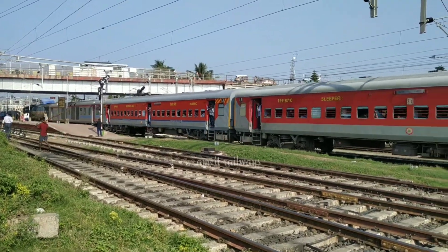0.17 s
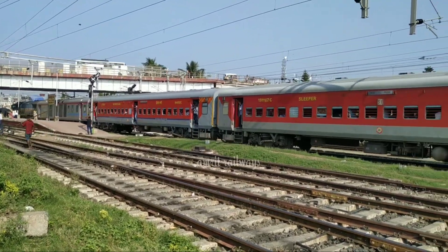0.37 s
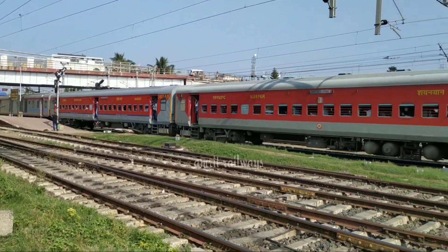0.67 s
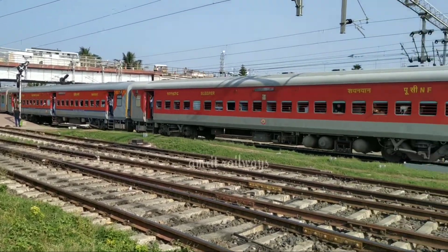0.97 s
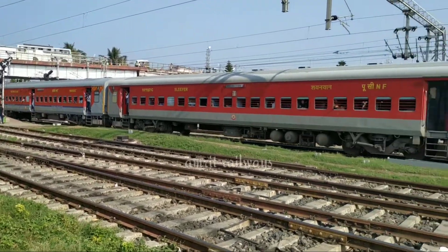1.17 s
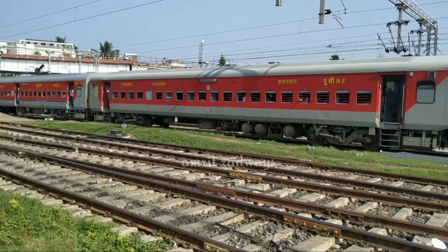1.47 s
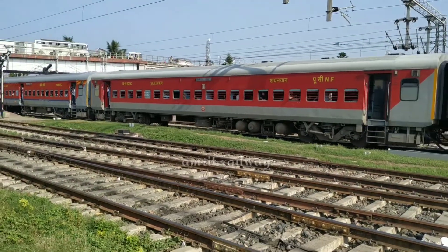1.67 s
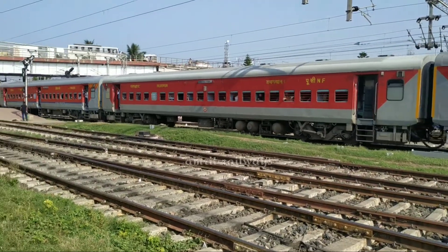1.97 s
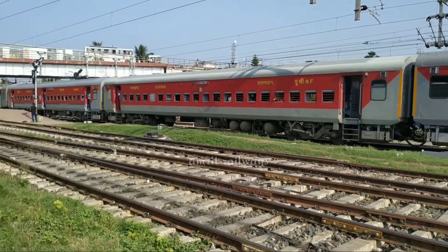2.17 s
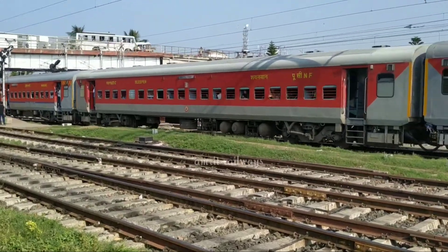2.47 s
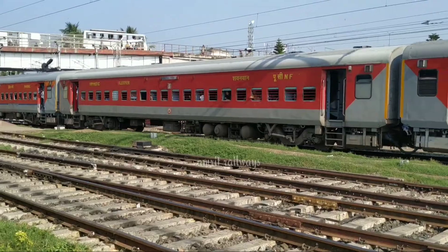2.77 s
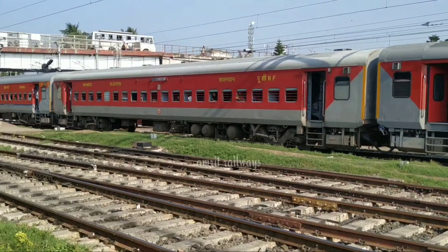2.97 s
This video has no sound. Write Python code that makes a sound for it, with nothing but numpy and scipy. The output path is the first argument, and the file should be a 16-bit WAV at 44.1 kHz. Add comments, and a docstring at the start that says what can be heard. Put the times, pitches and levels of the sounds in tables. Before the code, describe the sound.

Passenger train rolling slowly past with a low rumble and thin wheel squeal

```python
"""Passenger coaches roll slowly over station points, heard from the trackside. From the start two diesels drone
and beat against each other under the rumble, and a wheel squeals thinly. Rail modes ring as wheels pass, wheels
scrape, air hisses in short puffs and swaying bodies boom now and then. From 0.7 s the running gear knocks; near
1.5 s the rolling noise brightens as a bogie nears, then couplings clank. The squeal is strongest in the last
half second. Throughout, a limiter holds down the loudest bass swings."""
import sys
import numpy as np
from scipy import signal
from scipy.fft import rfft, irfft
from scipy.io import wavfile
from scipy.ndimage import uniform_filter1d, minimum_filter1d, map_coordinates

SR = 44100
rng = np.random.default_rng(int(sys.argv[2]) if len(sys.argv) > 2 else 0)


def master(y):
    """Save y as 16-bit WAV."""
    cut = np.clip(np.atleast_2d(y).T, -1, 1)
    pcm = np.round(cut * 32767)  # scale
    wavfile.write(sys.argv[1], SR, pcm.astype(np.int16))


N = 137592
BASS_PAN_DB, NEAR_LAG_MS = 1.86, 0.494


def undb(db):
    """Decibels to gain."""
    return 10 ** (np.asarray(db) / 20)


def unit(x):
    """Scale to rms 1."""
    return x / np.sqrt(np.mean(x ** 2))


def curve(table, axis=1):
    """One column of a timed table, joined by straight lines."""
    rows = np.array(table, float)
    return np.interp(np.arange(N) / SR, rows[:, 0], rows[:, axis])


def walk(rate_hz, size=8192):
    """Smooth random wander of rms 1."""
    f = np.fft.rfftfreq(size, N / SR / size)
    slow = unit(irfft(rfft(rng.standard_normal(size)) * np.exp(-(f / rate_hz) ** 2), size))
    return np.interp(np.arange(N) * size / N, np.arange(size), slow)


def colour(x, table, axis=1):
    """Filter by a spectrum table; white noise of rms 1 comes out at its dB per Hz."""
    rows, f = np.array(table, float), np.fft.rfftfreq(N, 1 / SR)
    db = np.interp(np.log(f + 1), np.log(rows[:, 0]), rows[:, axis])
    return irfft(rfft(x) * undb(db), N) * np.sqrt(SR / 2)


def noise(spectrum):
    """Mono noise with the given spectrum."""
    return colour(rng.standard_normal(N), spectrum)


def place(x, pan_db, lag_ms):
    """Mono to stereo: pan is left minus right level, and the left channel lags."""
    khz = np.fft.rfftfreq(N, 1000 / SR)
    late = irfft(rfft(x) * np.exp(-2j * np.pi * khz * lag_ms), N)
    return np.array([late * undb(pan_db / 2), x * undb(-pan_db / 2)])


def running_phase(hz):
    """Phase in radians of a frequency curve."""
    return 2 * np.pi * np.cumsum(hz) / SR


def harmonic(phase, multiple):
    """Sine at a whole multiple of the phase, with a random offset."""
    return np.sin(round(multiple) * phase + rng.uniform(0, 2 * np.pi))


# Each row: frequency in Hz, level in dB per Hz.
BREEZE_SPECTRUM = [(4, -63), (14, -55), (30, -48), (60, -70), (120, -65), (300, -70), (900, -110)]

def breeze():
    """Light air buffets each microphone separately."""
    return np.array([noise(BREEZE_SPECTRUM) for _ in range(2)])


# Each row: frequency in Hz, level in dB per Hz.
RUMBLE_SPECTRUM = [(4, -66), (25, -36), (50, -43), (80, -45.5), (120, -43), (170, -47), (225, -44.5),
                   (340, -50.5), (480, -59), (900, -105.5)]
# Each row: time in seconds, gain in dB.
RUMBLE_GAIN = [(0, -1), (.6, 0.5), (1.2, -3), (1.9, -2.5), (2.5, -1), (3.12, -3)]

def rumble(scatter_db=-11):
    """Coach bodies and track rumble, nearly alike on both sides."""
    scattered = np.array([noise(RUMBLE_SPECTRUM) for _ in range(2)])
    direct = place(noise(RUMBLE_SPECTRUM), BASS_PAN_DB, lag_ms=0.266)
    return (direct + undb(scatter_db) * scattered) * undb(curve(RUMBLE_GAIN))


# Each row: time in seconds, firing rate in Hz.
GENERATOR_FIRING = [(0, 73.6), (2.3, 73.5), (2.8, 74.7), (3.12, 74.7)]
# Each row: time in seconds, gain in dB.
GENERATOR_GAIN = [(0, -6.5), (.2, -4), (.45, -6.5), (.7, -11), (.95, -9), (1.3, -12), (1.6, -9),
                  (1.83, -19.5), (2.0, -13), (2.25, -12), (2.5, -29.5), (2.78, -10.5), (3.0, -13),
                  (3.12, -17.5)]
# Each row: multiple of the firing rate, relative level in dB.
GENERATOR_HARMONICS = [(1, 2.5), (2, -16.5), (3, -32.5)]

def generator(waver_db=3):
    """A six-cylinder diesel: the firing tone swells and dips, its overtones waver on their own."""
    phase = running_phase(curve(GENERATOR_FIRING))
    gain_db = curve(GENERATOR_GAIN)
    out = undb(gain_db + GENERATOR_HARMONICS[0][1]) * np.sin(phase)
    for multiple, db in GENERATOR_HARMONICS[1:]:
        out += undb(gain_db.mean() + db + waver_db * walk(5.1)) * harmonic(phase, multiple)
    return np.sqrt(2) * out


# Each row: multiple of the engine's working cycle rate, relative level in dB.
LOCOMOTIVE_HARMONICS = [(8, -5), (11, -6.5), (15, -5.5), (16, -3), (17, -0.5), (19, -13.5), (23, -17.5)]
# Each row: time in seconds, gain in dB.
LOCOMOTIVE_GAIN = [(0, -14), (.18, -15.5), (.45, -11), (.95, -12), (1.2, -18.5), (1.55, -15), (1.87, -19),
                   (2.55, -19), (3.12, -25.5)]

def locomotive(cycle_hz=5.755, waver_db=3.5):
    """Uneven diesel cylinders give close tones that throb together."""
    phase = running_phase(cycle_hz * (1 + 0.0025 * walk(0.98)))
    out = 0
    for multiple, db in LOCOMOTIVE_HARMONICS:
        out += undb(db + waver_db * walk(0.72)) * harmonic(phase, multiple)
    return np.sqrt(2) * out * undb(curve(LOCOMOTIVE_GAIN))


def swells(table, grit_db):
    """A resonance or band of noise swells and fades; grit breaks it into grains."""
    out, t, f = 0, np.arange(N) / SR, np.fft.rfftfreq(N, 1 / SR)
    for peak_s, half_s, db, hz, octaves, pan_db in table:
        contact = rng.standard_normal(N) * undb(grit_db * walk(300))
        resonance = np.exp(-.5 * (np.log2((f + 1) / hz) / octaves) ** 2)
        ring = unit(irfft(rfft(contact) * resonance, N))
        envelope = np.exp(-.5 * ((t - peak_s) / half_s) ** 2)
        out += place(undb(db) * ring * envelope, pan_db, lag_ms=0.29)
    return out


# Each row: peak time and half length in seconds, level in dB, centre in Hz, width in octaves, pan in dB.
BODY_BOOMS = [(.24, 0.041, -25, 238, 0.18, 5), (1.23, 0.034, -22.5, 210, 0.11, 1),
              (2.29, 0.036, -28.5, 260, .3, 2), (2.70, 0.031, -22.5, 217, .2, -2),
              (2.88, .03, -23, 202, 0.11, 5)]

def booms():
    """Coach bodies boom as they sway."""
    return swells(BODY_BOOMS, grit_db=4.0)


# Each row: peak time and half length in seconds, level in dB, centre in Hz, width in octaves, pan in dB. Long
# low rows are rail modes ringing as wheels pass, short high rows are puffs of air hiss, the rest are wheel
# scrapes.
RAIL_AND_AIR_SWELLS = [(0.162, 0.22, -30.5, 810, 0.25, -0.5), (0.421, 0.022, -40, 7300, 0.5, -15),
                       (0.44, 0.03, -30, 1550, 0.44, -10), (.4, .32, -42, 1570, 0.31, -10.5),
                       (0.773, 0.0073, -36, 8500, 0.56, -14), (.98, .05, -52, 7900, .35, -25),
                       (1.103, 0.93, -41.5, 2630, 0.17, 5), (1.635, 0.0072, -39, 10600, 0.39, -3),
                       (2.412, 0.038, -45, 9100, .5, -7), (2.54, 0.035, -38, 5770, 0.63, -9),
                       (2.627, 0.15, -33, 573, 0.13, -2), (3.04, 0.074, -43, 8050, .55, -1)]

def rail_and_air():
    """Rail modes ring as wheels pass, wheels scrape on the rail, and air hisses in short puffs."""
    return swells(RAIL_AND_AIR_SWELLS, grit_db=0.5)


def blows(table, spectrum, attack_s):
    """Short jolts ring a steel body and die away."""
    out, t = 0, np.arange(N) / SR
    for start_s, db, t60_s, pan_db in table:
        age_s = np.maximum(t - start_s, 0)
        envelope = np.minimum(age_s / attack_s, 1) * np.exp(-np.log(1000) * age_s / t60_s)
        out += place(2 * undb(db) * envelope * unit(noise(spectrum)), pan_db, NEAR_LAG_MS)
    return out


# Each row: start in seconds, relative level in dB, 60 dB decay time in seconds, pan in dB.
GEAR_KNOCKS = [(.728, -21, 0.052, 8.5), (.932, -21, 0.018, 33), (1.111, -27.5, 0.028, 24),
               (1.497, -27.5, 0.071, 22), (1.509, -23.5, 0.052, 21), (1.527, -34, 0.054, 10)]
# Each row: frequency in Hz, relative level in dB.
KNOCK_SPECTRUM = [(150, 13), (400, 2), (1000, 4), (1400, -11), (3000, -8.5), (9000, -37)]

def knocks():
    """The running gear takes short, dull jolts."""
    return blows(GEAR_KNOCKS, KNOCK_SPECTRUM, attack_s=0.0019)


# Each row: start in seconds, relative level in dB, 60 dB decay time in seconds, pan in dB.
COUPLING_CLANKS = [(1.69, -30, 0.19, 0), (2.05, -28, 0.18, -4), (2.95, -37, 1, 3), (3.095, -33, 0.13, -3)]
# Each row: frequency in Hz, relative level in dB.
CLANK_SPECTRUM = [(300, -18), (650, -12), (1200, 6), (1700, 6), (1775, 14.5), (1860, -1), (2600, 4),
                  (5000, -31), (12000, -42)]

def clanks():
    """Jolted couplings ring in the midrange."""
    return blows(COUPLING_CLANKS, CLANK_SPECTRUM, attack_s=0.0076)


def ringing(hz, width_hz):
    """A rubbed wheel mode: a tone whose strength and phase wander."""
    phase = running_phase(hz * np.ones(N))
    return unit(walk(width_hz) * np.cos(phase) + walk(width_hz) * np.sin(phase))


# Each row: time in seconds, pitch in Hz.
SQUEAL_HZ = [(0, 5075), (.3, 5095), (1.0, 5097), (1.9, 5128), (2.3, 5115), (2.65, 5078), (3.12, 5070)]
# Each row: time in seconds, gain in dB.
SQUEAL_GAIN = [(0, -47.5), (.2, -41.5), (.44, -36.5), (.58, -51), (.8, -45), (1.05, -44.5), (1.33, -51),
               (1.68, -41.5), (2.03, -41), (2.3, -37), (2.47, -38.5), (2.63, -31.5), (2.75, -36.5),
               (2.86, -31), (2.94, -36.5), (3.03, -30), (3.12, -32.5)]
# Each row: time in seconds, pan in dB, left lag in ms.
SQUEAL_POSITION = [(0, -10.5, 0.27), (.7, -2, .36), (1.05, 0, 0.36), (1.55, 3, 0.44), (1.9, 6.5, .49),
                   (2.3, 7.5, .475), (2.6, -1, 0.46), (2.85, 6.5, 0.432), (3.12, 3.5, .38)]
# Each row: frequency in Hz, level in dB relative to the squeal gain.
FAINT_MODES = [(2786, -4)]

def squeal(tone_db=2, halo_db=-3.5, flutter_db=0.5):
    """One wheel sings, purer as it grows, and drifts sideways; other wheels smear a halo around it."""
    hz, db = curve(SQUEAL_HZ), curve(SQUEAL_GAIN)
    pan_db, lag_ms = curve(SQUEAL_POSITION, axis=1), curve(SQUEAL_POSITION, axis=2)
    purity = undb(0.45 * (db - db.max()))
    waver_hz = 11 * walk(46.6) / np.sqrt(purity)
    tone = unit(np.sin(running_phase(hz + waver_hz)) * undb(flutter_db * walk(28)))
    halo = ringing(hz + 18, width_hz=95)
    song = undb(tone_db) * purity * tone + undb(halo_db) * halo / purity
    late = map_coordinates(song, [np.arange(N) - lag_ms * SR / 1000], mode="mirror")
    stereo = np.array([late * undb(pan_db / 2), song * undb(-pan_db / 2)])
    for mode_hz, mode_db in FAINT_MODES:
        stereo += undb(mode_db) * place(ringing(mode_hz, width_hz=19), 3.0, NEAR_LAG_MS)
    return undb(db) * stereo


def shifting_resonances(x, rate_hz, depth_db=2.5, bands=56):
    """Wheel and rail resonances come and go: each narrow band from 300 to 6000 Hz swells on its own."""
    f, spectrum = np.fft.rfftfreq(N, 1 / SR), rfft(x)
    band = np.clip(np.log((f + 1) / 300) / np.log(6000 / 300), 0, 1) * bands
    out = 0
    for k in range(bands + 1):
        swell = undb(depth_db * walk(rate_hz)) if 0 < k < bands else 1
        triangle = np.maximum(1 - np.abs(band - k), 0)
        out += swell * irfft(spectrum * triangle, N)
    return out


def rolling(spectrum, direct_share, lag_ms, grit_db, swell_hz, judder_db=1.5):
    """Rough treads judder on the rail; part arrives straight, part scattered by the yard."""
    contact = rng.standard_normal(N) * undb(judder_db * walk(21.0) + grit_db * walk(570))
    direct = np.sqrt(direct_share) * place(unit(contact), 0, lag_ms)
    scattered = np.sqrt(1 - direct_share) * rng.standard_normal((2, N))
    left, right = shifting_resonances(direct + scattered, swell_hz)
    return np.array([colour(left, spectrum, axis=1), colour(right, spectrum, axis=2)])


# Each row: frequency in Hz, left and right relative levels in dB per Hz.
FAR_SPECTRUM = [(200, -77, -62), (455, -59.5, -59.5), (860, -56.5, -54), (1190, -62.5, -60),
                (1660, -64, -58), (2540, -61.5, -70), (3600, -72.5, -70), (4900, -74, -70),
                (5630, -86, -77.5), (8700, -101, -76), (13000, -102, -80.5), (14800, -116, -99)]
# Each row: time in seconds, gain in dB.
FAR_GAIN = [(0, -3), (.45, -0.5), (.6, -2), (1.0, -2.5), (1.4, -3), (2.0, -5), (3.12, -6.5)]

def far_wheels():
    """Wheels roll further along the train, slowly fading."""
    roll = rolling(FAR_SPECTRUM, direct_share=0.61, lag_ms=0.35, grit_db=1.0, swell_hz=4.4)
    return roll * undb(curve(FAR_GAIN))


# Each row: frequency in Hz, left and right relative levels in dB per Hz.
NEAR_SPECTRUM = [(254, -64.5, -97), (597, -58, -55), (786, -60.5, -66), (1020, -60.5, -70.5),
                 (1730, -65.5, -75), (2380, -62, -65.5), (4000, -67.5, -73.5), (4600, -71.5, -70.5),
                 (6370, -76, -77.5), (10300, -89.5, -88), (13100, -102, -109), (15000, -112, -110)]
# Each row: time in seconds, gain in dB.
NEAR_GAIN = [(0, -9.5), (1.25, -16), (1.52, -4.5), (1.75, -1), (2.1, 0), (2.35, 0), (2.55, 2), (2.8, 1),
             (3.0, 3.5), (3.12, 2)]

def near_bogie():
    """Grittier rolling noise rises as a bogie nears."""
    roll = rolling(NEAR_SPECTRUM, direct_share=0.46, lag_ms=NEAR_LAG_MS, grit_db=2.5, swell_hz=11.0)
    return roll * undb(curve(NEAR_GAIN))


def scene():
    """Engines, wheels, small noises, rumble, air and squeal in stereo."""
    engines = place(generator() + locomotive(), BASS_PAN_DB, lag_ms=0.6)
    wheels = far_wheels() + near_bogie()
    small_noises = knocks() + clanks() + rail_and_air() + booms()
    return engines + wheels + small_noises + rumble() + breeze() + squeal()


def record(dry, drive_db=-1.5, top_hz=15300):
    """A fast limiter holds the peaks at full scale; a low-pass cuts the top."""
    x = dry * undb(drive_db)
    headroom = np.minimum(1, 1 / (np.abs(x) + 1e-9))
    held = minimum_filter1d(headroom, size=221, axis=1)  # 5 ms
    gain = uniform_filter1d(held, size=221, axis=1)
    lowpass = signal.ellip(8, .2, 70, top_hz, fs=SR, output="sos")
    return signal.sosfilt(lowpass, x * gain)


dry = scene()
out = record(dry)
master(out)
```